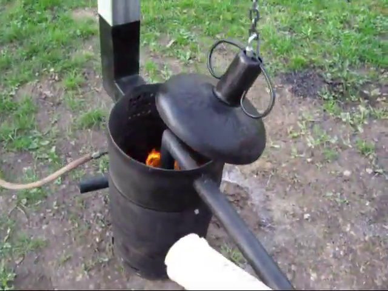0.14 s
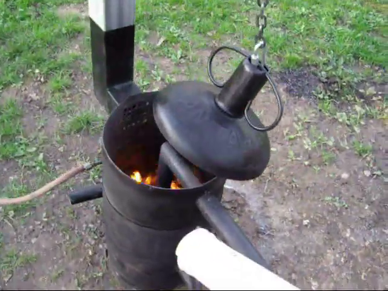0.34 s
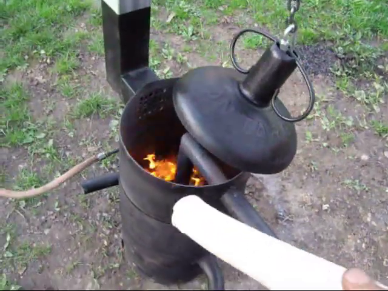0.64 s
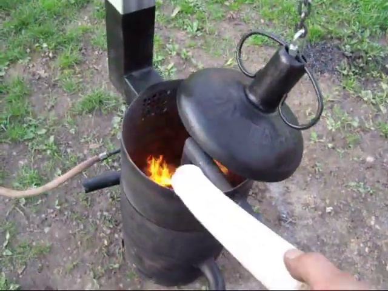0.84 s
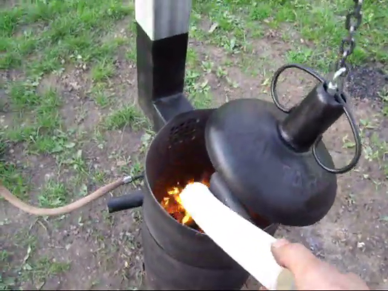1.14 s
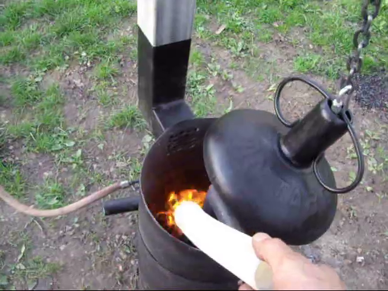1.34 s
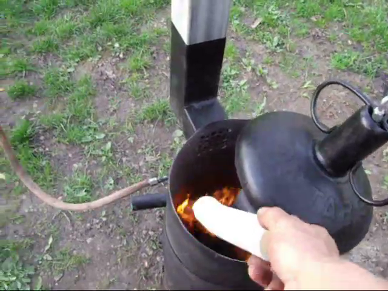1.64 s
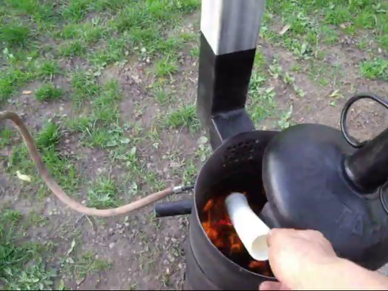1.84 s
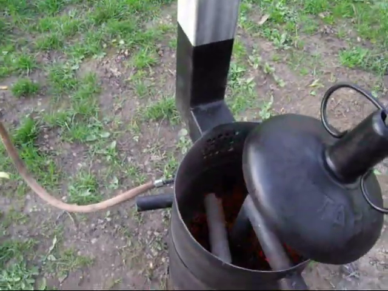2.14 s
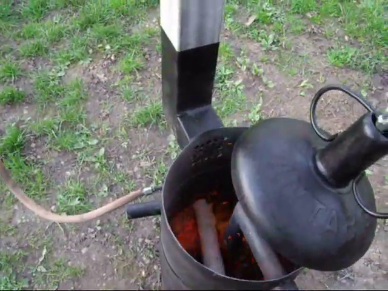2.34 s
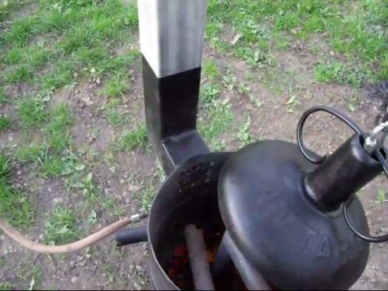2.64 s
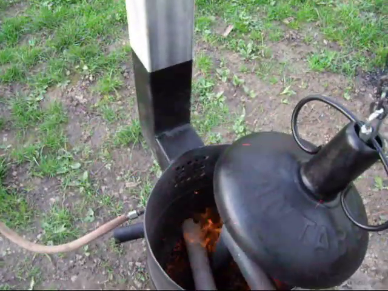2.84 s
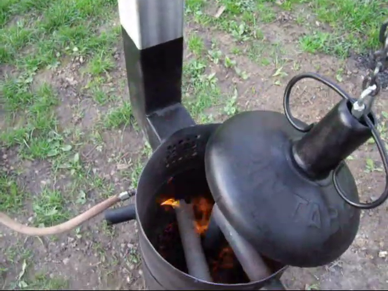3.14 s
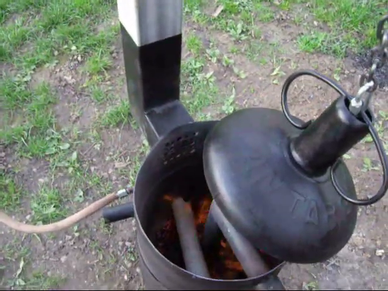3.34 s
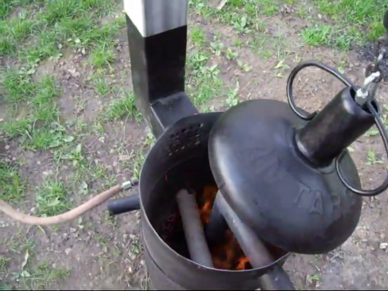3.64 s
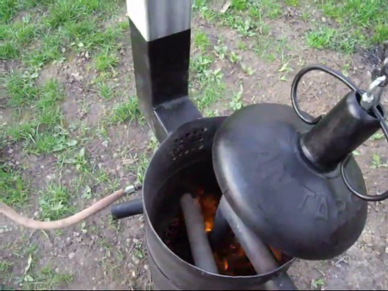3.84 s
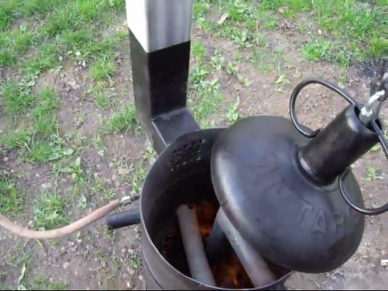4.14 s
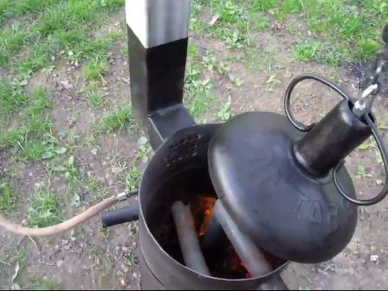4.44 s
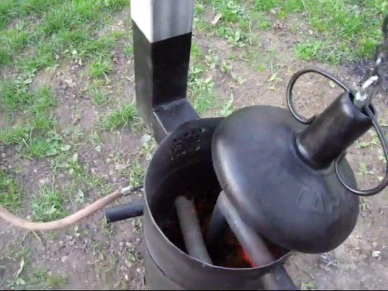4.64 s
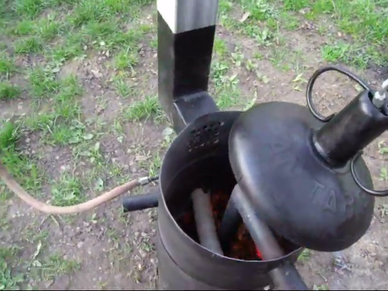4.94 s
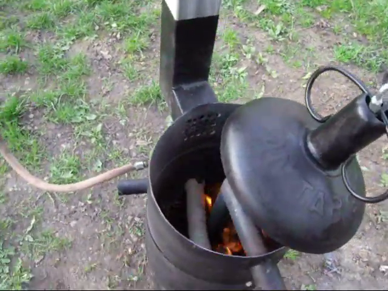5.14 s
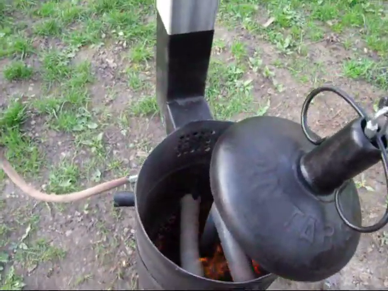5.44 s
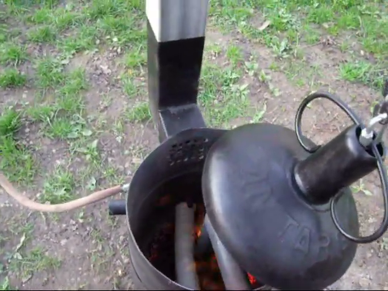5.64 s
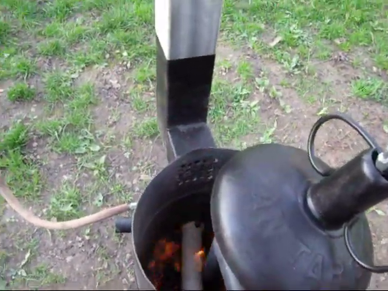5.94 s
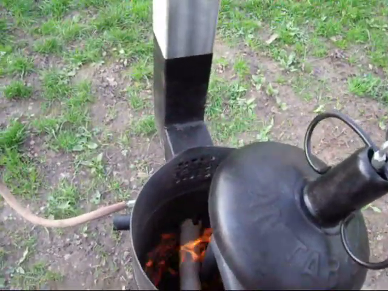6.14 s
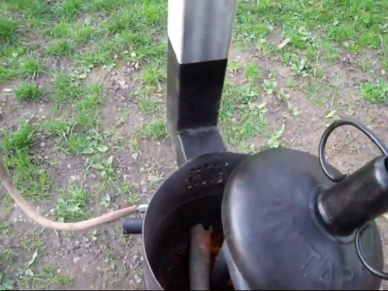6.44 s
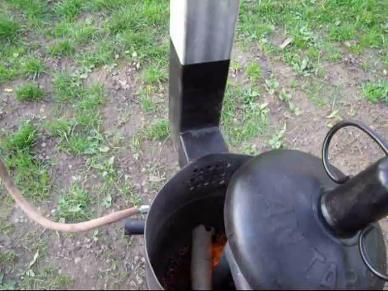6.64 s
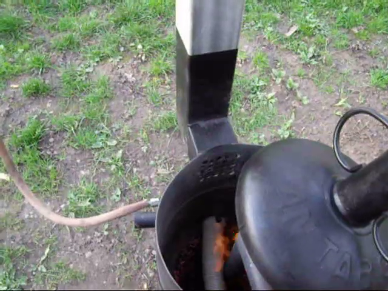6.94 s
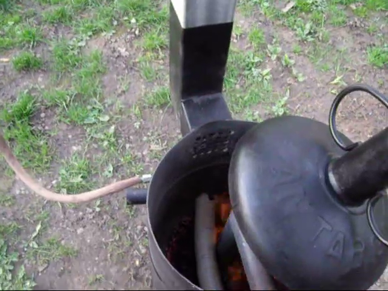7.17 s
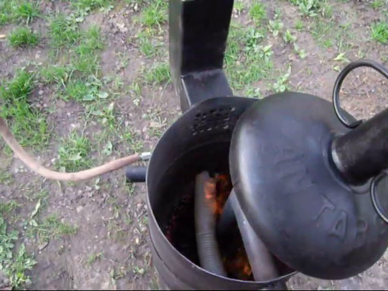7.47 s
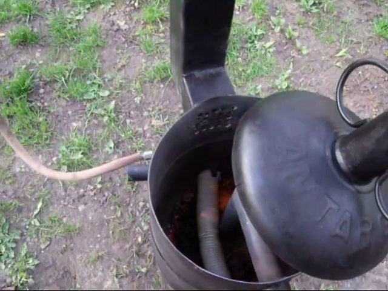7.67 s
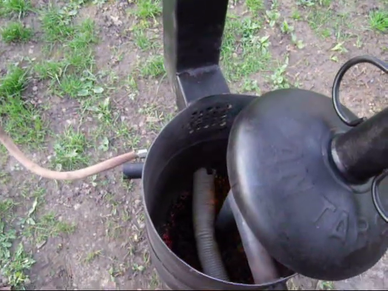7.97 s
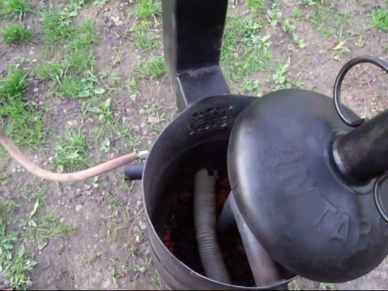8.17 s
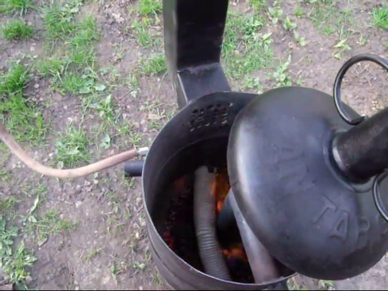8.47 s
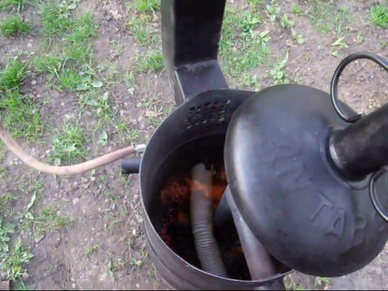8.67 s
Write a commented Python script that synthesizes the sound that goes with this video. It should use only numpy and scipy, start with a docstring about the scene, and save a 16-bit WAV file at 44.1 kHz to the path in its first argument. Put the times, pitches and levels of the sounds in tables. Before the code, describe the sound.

Close, loud, hollow stove roar with low buffeting, gas pops, airy sizzle, a faint thin whine and one hard crack early on.

```python
"""A deep, throbbing roar: fire in an open steel drum stove in a garden, burning plastic, air fed by a hose.
Turbulent flames drive the drum's air modes; gas pockets boom as they catch, over a broad low rumble.
The air jet and melting plastic make shaped-noise hisses; a blower whines faintly as a wavering sine.
The microphone moves from beside the drum to over its mouth. The dull, nearly overloaded recorder
adds hiss and ticks, mostly about a second apart; the tallest one cracks."""
import sys
import numpy as np
from scipy import signal
from scipy.fft import rfft, irfft, next_fast_len
from scipy.io import wavfile
from scipy.ndimage import uniform_filter1d

SR = 44100
rng = np.random.default_rng(int(sys.argv[2]) if len(sys.argv) > 2 else 0)


def dump(signal):
    """Clip the signal to [-1, 1] and save it as 16-bit WAV at the path in sys.argv[1]."""
    limited = np.clip(np.atleast_2d(signal).T, -1, 1)
    pcm = np.round(limited * 32767).astype(np.int16)
    wavfile.write(sys.argv[1], SR, pcm)


N = 388521
TIME, FREQ = np.arange(N) / SR, np.arange(N // 2 + 1) * SR / N

# strength of the burn before throbbing: time_s, level_db
BURN_LEVEL = [(0, -14), (1.3, -11), (2.3, -14), (2.85, -11), (3.8, -9.5), (4.1, -13.5), (4.8, -13.5),
              (5.1, -9.5), (5.9, -10), (6.4, -12), (6.9, -10.0), (7.5, -11), (7.75, -10), (8.81, -12)]
# deep air resonances of drum and flue: pitch_hz, width_hz, relative_level_db
DEEP_AIR_MODES = [(147, 67, -21), (244.7, 55.6, 2), (278.3, 112, -9), (335, 65, -16)]
# uneven pulsation of the flames
THROB_HZ, THROB_SPREAD_HZ, THROB_RMS_DB = 7.9, 11, 1.35
# microphone position: time_s, share_beside (1 beside the drum, 0 over its mouth)
MIC_BESIDE = [(0, 0.86), (.75, 0.91), (1.3, 0.52), (2.2, 0.2), (3, 0.14), (8.81, 0)]
# hollows and rises heard beside the drum: pitch_hz, width_hz, change_db
SIDE_COLOURING = [(166, 27, 5.5), (205, 29, -5), (356, 150, 3), (484, 78, -16), (785, 120, -3.5),
                  (1056, 94, -11.5), (1470, 270, 2.5), (2600, 400, -1.5), (3040, 180, 3), (3420, 180, 3)]
# buffeting of the burning gas, before the rumble gain: time_s, level_db
BUFFET_LEVEL = [(0, -32.5), (1.9, -32.0), (2.9, -28.5), (4.1, -32), (5, -30.5), (8.81, -28)]
# spectrum of the buffeting: pitch_hz, relative_density_db_per_hz
RUMBLE_SPECTRUM = [(10, -18.5), (25, -11), (45, -7), (65, -3.5), (100, -3), (140, -1), (220, 0.5),
                   (450, -9.5), (900, -34)]
# flames tearing in the draught: time_s, lower_modes_level_db, upper_modes_level_db
FLAME_LEVELS = [(0, -33, -34.5), (0.8, -30.0, -29.5), (1.4, -29, -31), (2.45, -32, -36), (2.9, -27, -31),
                (3.35, -30, -35.0), (3.7, -26, -31.5), (4.55, -30, -31.5), (5.2, -28, -33.5),
                (6.3, -26.0, -32.5), (7.5, -28, -33), (8.45, -27.5, -30.5), (8.81, -28, -31)]
# middle air modes of the drum: pitch_hz, width_hz, relative_level_db
LOWER_AIR_MODES = [(522, 90, 0), (608, 154, 0), (794, 113, 0), (877, 74, -4.5)]
# high air modes of the drum: pitch_hz, width_hz, relative_level_db
UPPER_AIR_MODES = [(1112, 216, 2), (1284, 280, -3.5), (1460, 440, -8), (1623, 240, -3.5)]
# force of the air jet, before the rush and sizzle gains: time_s, level_db
JET_FORCE = [(0, -39.5), (0.25, -38.5), (0.95, -33.0), (1.9, -35), (2.9, -38.5), (3.4, -44), (3.7, -41),
             (4.18, -42.5), (4.4, -35.5), (5.6, -36), (6.1, -34.5), (7.5, -33.5), (7.9, -37.5),
             (8.4, -31.5), (8.81, -33.5)]
# spectrum of the jet's rush: pitch_hz, relative_density_db_per_hz
RUSH_SPECTRUM = [(600, -7), (1400, 1.5), (1850, -3.5), (2150, 1.5), (2350, -0.5), (2550, 2), (2820, 0),
                 (3050, 1.5), (3600, 0), (3900, -5), (4500, -17)]
# spectrum of the finer sizzle: pitch_hz, relative_density_db_per_hz
SIZZLE_SPECTRUM = [(3000, -23), (3800, -4.5), (4150, 1), (4450, -1), (4900, -1.5), (6000, -8.5)]
# short hisses of melting plastic: peak_s, sizzle_rise_db
PLASTIC_SPITS = [(1.89, 5), (4.42, 4)]
SPIT_HALF_WIDTH_S = 0.065  # to 1/e of the dB rise
# blower tone: mean pitch, mean rms level over the mouth
WHINE_HZ, WHINE_OVER_MOUTH_DB = 927, -42.5
# recorder ticks, each a jump in the wave: time_s, jump_height_db, settling_s
RECORDER_TICKS = [(.4410, -11, .001), (1.4396, 6, 0.00085), (3.436, -7, 0.0021), (4.4346, -0.5, 0.0017),
                  (5.4346, -7, 0.0057), (6.4313, -6, .0015), (7.4314, -6.5, 0.0036), (8.4287, -15, .002)]
# gas pockets that catch all at once: start_s, boom_drive_db, flare_start_db
GAS_PUFFS = [(1.096, -8, -24), (1.442, -2, -20), (1.8977, 2, -17.5), (2.779, -1, -25), (2.8659, -7, -22),
             (3.02, -2.5, -19), (4.5979, 4.5, -22), (4.9705, -5, -24), (5.167, 0.5, -8), (5.384, -12, -22),
             (5.8745, -6, -22), (8.2852, -8, -25)]
# shrill parts of the tallest tick: pitch_hz, width_hz, level_db
CRACK_PARTS = [(520, 620, -6), (5400, 4700, 6), (10100, 3400, 3)]
# recorder: input and final low-pass edges, hiss rms ahead of the final low-pass
INPUT_BAND_HZ, CUTOFF_HZ, SELF_NOISE_DB = 5130, 12650, -51.5


def from_db(db):
    """Decibels to amplitude gain."""
    return 10 ** (np.asarray(db) / 20)


def rms_one(x):
    """Scale to unit rms."""
    return x / np.sqrt(np.mean(x ** 2) + 1e-20)


def in_time(rows):
    """Interpolate a two-column control curve to every sample."""
    return np.interp(TIME, *np.transpose(rows))


def noise(gain):
    """Unit-rms Gaussian noise shaped by a gain over FREQ."""
    size = next_fast_len(N, real=True)
    size_hz = np.arange(size // 2 + 1) * SR / size
    spectrum = rfft(rng.standard_normal(size)) * np.interp(size_hz, FREQ, gain)
    return rms_one(irfft(spectrum, size)[:N])


def colour(points):
    """Gain over FREQ, interpolated in dB over log frequency."""
    hz, db = np.transpose(points)
    return from_db(np.interp(np.log(FREQ + 1), np.log(hz), db))


def bell(hz, width_hz):
    """Resonance curve of height 1, half height at hz +/- width_hz / 2."""
    return 1 / (1 + (2 * (FREQ - hz) / width_hz) ** 2)


def resonances(modes):
    """Gain of independently driven modes, whose powers add."""
    return np.sqrt(sum((from_db(db) * bell(hz, width_hz)) ** 2 for hz, width_hz, db in modes))


def drift(rate_hz):
    """Unit-rms random wander, rolling off around rate_hz."""
    return noise(1 / (1 + (FREQ / rate_hz) ** 2) ** 2)


def steadied(x, span_s):
    """Divide out the noise's slow chance swells of power; keep quicker changes."""
    size = max(int(span_s * SR), 1)
    power = uniform_filter1d(uniform_filter1d(x ** 2, size), size)
    return x / np.sqrt(power + 1e-12)


def heard(gain):
    """Turbulence noise; the path round the rim colours it while the microphone is beside the drum."""
    side_db = sum(db * bell(hz, width_hz) for hz, width_hz, db in SIDE_COLOURING)
    share = np.clip(in_time(MIC_BESIDE), 0, 1)
    over_mouth = np.sqrt(1 - share) * noise(gain)
    return over_mouth + np.sqrt(share) * noise(gain * from_db(side_db))


def roar(steady_span_s=0.084):
    """Irregular throbs of the drum air at an otherwise even level, following the burn curve."""
    throb = from_db(THROB_RMS_DB * noise(bell(THROB_HZ, THROB_SPREAD_HZ)))
    deep_air = steadied(heard(resonances(DEEP_AIR_MODES)), steady_span_s)
    return from_db(in_time(BURN_LEVEL)) * throb * deep_air


def rumble(gain_db=6.0):
    """Burning gas buffets broadly under the resonance."""
    return from_db(in_time(BUFFET_LEVEL) + gain_db) * heard(colour(RUMBLE_SPECTRUM))


def flames(lower_flutter_db=1.8, upper_flutter_db=2.0, flutter_rate_hz=42):
    """Flapping flames excite the higher air modes in quick spurts."""
    time_s, lower_db, upper_db = np.transpose(FLAME_LEVELS)
    flap = drift(flutter_rate_hz)  # shared by both groups of modes
    lower = from_db(lower_flutter_db * flap) * heard(resonances(LOWER_AIR_MODES))
    upper = from_db(upper_flutter_db * flap) * heard(resonances(UPPER_AIR_MODES))
    lower_gain = from_db(np.interp(TIME, time_s, lower_db))
    upper_gain = from_db(np.interp(TIME, time_s, upper_db))
    return lower_gain * steadied(lower, span_s=0.29) + upper_gain * steadied(upper, span_s=0.18)


def reflected(x, gain=0.32, delay_s=0.002082, sway_rms_s=.00017, sway_rate_hz=1.2):
    """The lid returns a faint copy; the swaying hand shifts its delay, so ripples glide through the hiss."""
    arrival_s = TIME - delay_s - sway_rms_s * drift(sway_rate_hz)
    late = np.interp(arrival_s, TIME, x)
    return (x + gain * late) / np.sqrt(1 + gain ** 2)


def jet(flutter_rms_db=0.95, flutter_rate_hz=35, rush_gain_db=2.0, sizzle_gain_db=-1.5):
    """Air rushes into the embers and fans the sizzling, spitting melt; both flutter lightly."""
    force_db = in_time(JET_FORCE)
    spit_db = sum(db * np.exp(-((TIME - s) / SPIT_HALF_WIDTH_S) ** 2) for s, db in PLASTIC_SPITS)
    rush = from_db(force_db + rush_gain_db) * heard(colour(RUSH_SPECTRUM))
    sizzle = from_db(force_db + sizzle_gain_db + spit_db) * noise(colour(SIZZLE_SPECTRUM))
    return reflected(rush + sizzle) * from_db(flutter_rms_db * drift(flutter_rate_hz))


def blower(wander_share=.0012, waver_rms_db=0.2, beside_db=-9):
    """A thin, slightly unsteady blade tone comes up out of the mouth, weaker beside the drum."""
    pitch_hz = WHINE_HZ * (1 + wander_share * drift(3.2))
    phase = 2 * np.pi * np.cumsum(pitch_hz) / SR
    level_db = WHINE_OVER_MOUTH_DB + waver_rms_db * drift(3) + beside_db * in_time(MIC_BESIDE)
    return np.sqrt(2) * from_db(level_db) * np.sin(phase)


def ticks(rise_s=.00007):
    """The wave is drawn one way, then snaps across; slow settling adds a small thump."""
    out = np.zeros(N)
    for s, db, settle_s in RECORDER_TICKS:
        near = abs(TIME - s) < .05
        t = TIME[near] - round(s * SR) / SR
        jump = np.clip(t / rise_s, -.5, .5)
        out[near] += from_db(db) * jump * np.exp(-abs(t) / settle_s)
    return out


def puffs(rise_s=0.0012, burst_s=0.0043):
    """Each pocket flares for a few milliseconds and sets the strongest air mode booming."""
    hz, width_hz, _ = max(DEEP_AIR_MODES, key=lambda mode: mode[2])
    boom, flare = np.zeros(N), np.zeros(N)
    for s, boom_db, flare_db in GAS_PUFFS:
        near = (TIME > s) & (TIME < s + .1)
        t = TIME[near] - s
        envelope = (1 - np.exp(-t / rise_s)) * np.exp(-width_hz * t)
        boom[near] += from_db(boom_db) * envelope * np.sin(2 * np.pi * hz * t)
        flare[near] += from_db(flare_db) * np.exp(-t / burst_s)
    return boom + flare * noise(resonances(LOWER_AIR_MODES))


def cracked(x, lost_s=0.00047):
    """At the tallest tick the wave is lost for an instant and a shrill snap takes its place."""
    t = TIME - max(RECORDER_TICKS, key=lambda tick: tick[1])[0]
    snap = np.zeros(N)
    for k, (hz, width_hz, db) in enumerate(CRACK_PARTS):
        envelope = np.exp(-np.pi * (width_hz * t) ** 2)
        snap += (-1) ** k * from_db(db) * envelope * np.sin(2 * np.pi * hz * t)
    return x * (1 - np.exp(-np.pi * (t / lost_s) ** 2)) + snap


def scene():
    """All the stove's sounds at one microphone in the open air."""
    return (roar() + rumble() + flames() + jet() + blower() + puffs())[None]


def record(dry):
    """Clipped, narrow-band input; then ticks, crack and hiss; clipped again and the top cut."""
    input_filter = signal.butter(22, INPUT_BAND_HZ, fs=SR, output="sos")
    narrow = signal.sosfilt(input_filter, np.clip(dry, -.97, .97))
    stored = cracked(narrow + ticks()) + from_db(SELF_NOISE_DB) * rng.standard_normal(N)
    top_cut = signal.ellip(10, .2, 80, CUTOFF_HZ, fs=SR, output="sos")
    return signal.sosfilt(top_cut, np.clip(stored, -1, 1))


dry = scene()
out = record(dry)
dump(out)
```